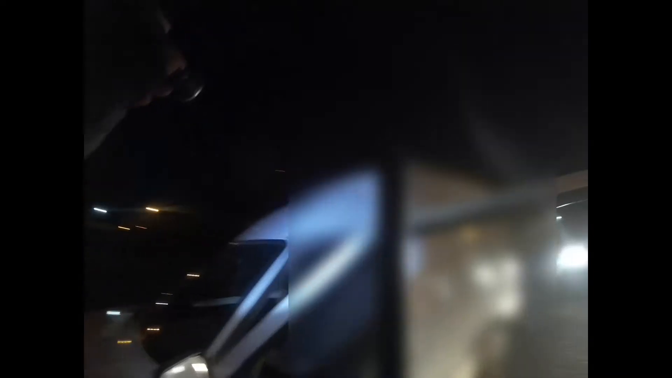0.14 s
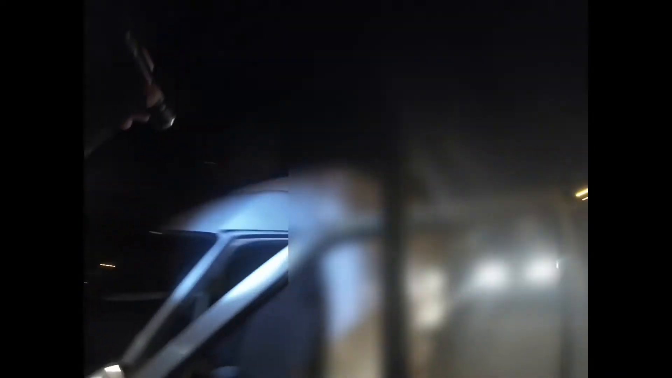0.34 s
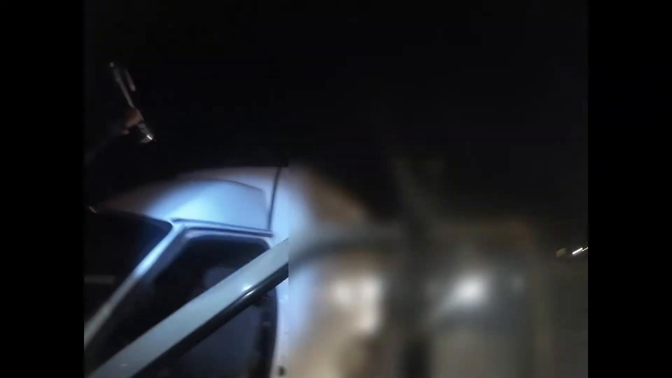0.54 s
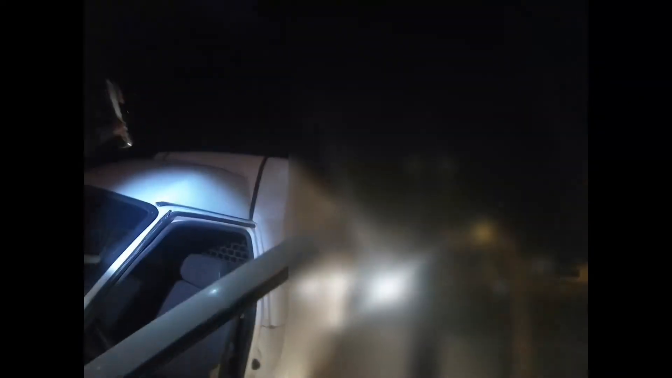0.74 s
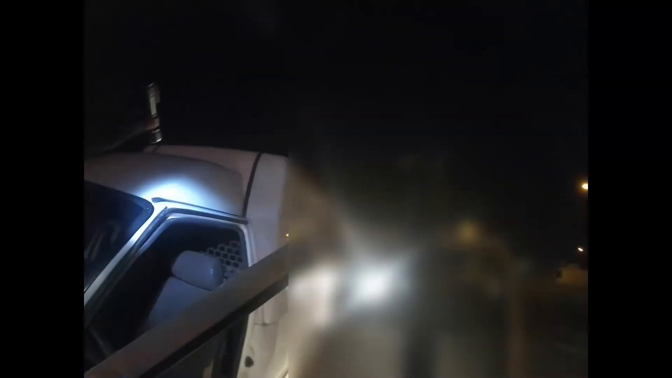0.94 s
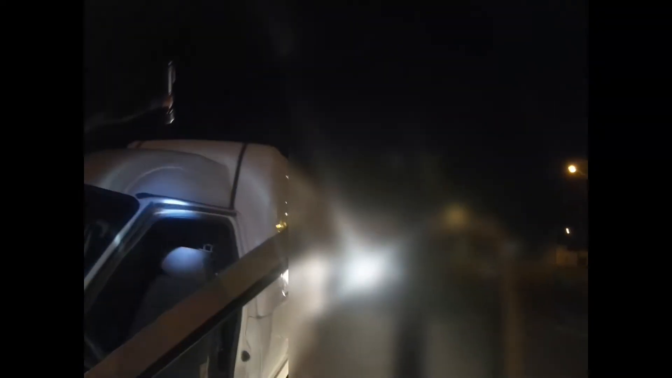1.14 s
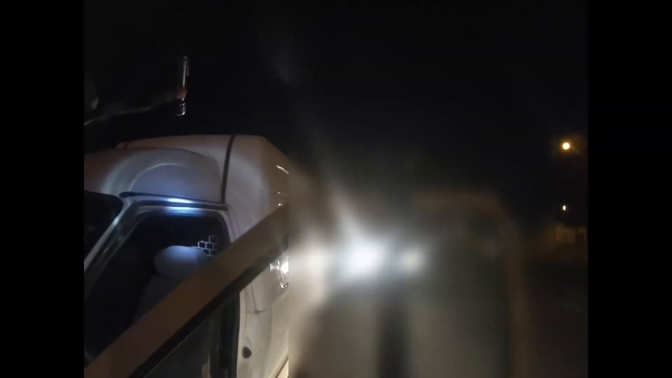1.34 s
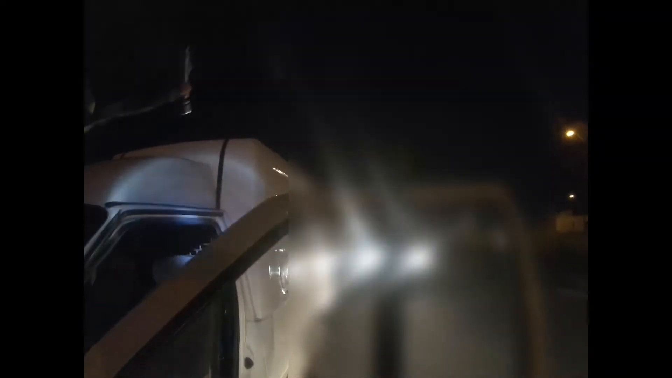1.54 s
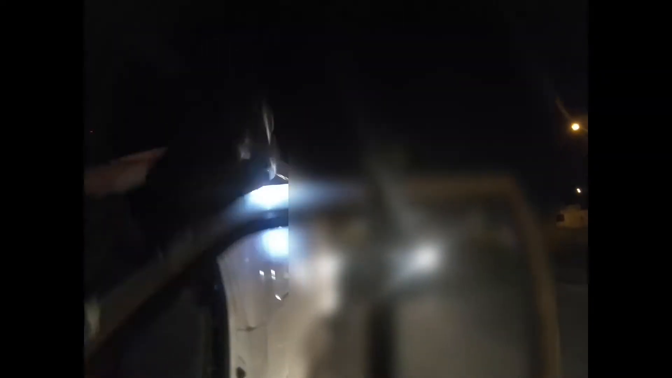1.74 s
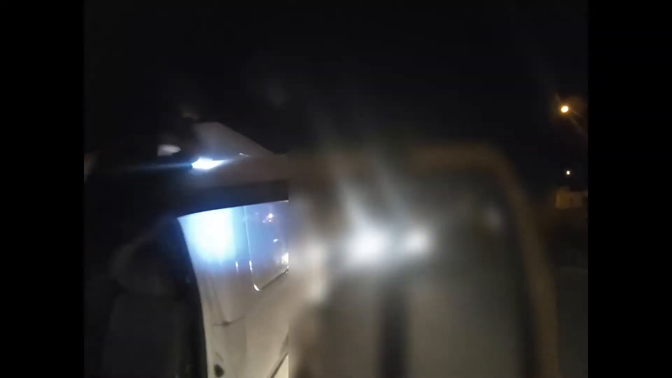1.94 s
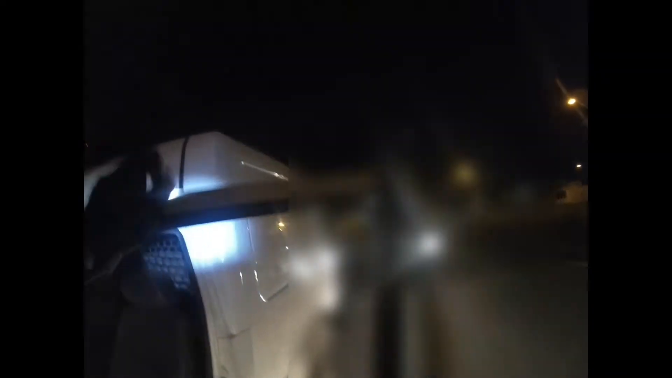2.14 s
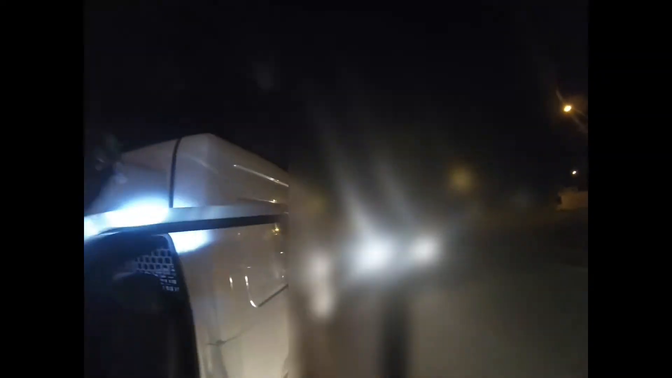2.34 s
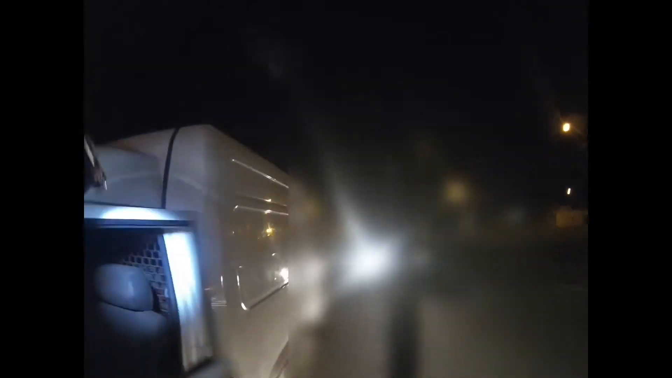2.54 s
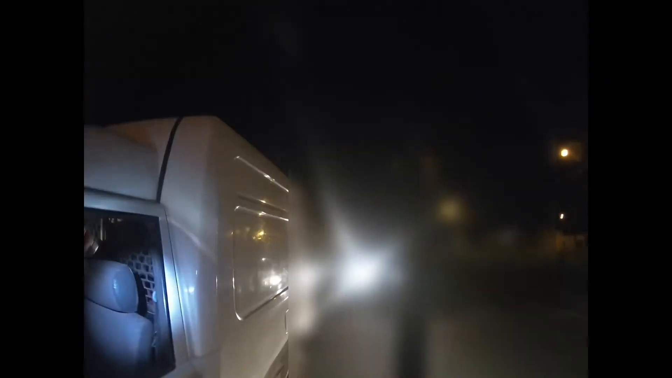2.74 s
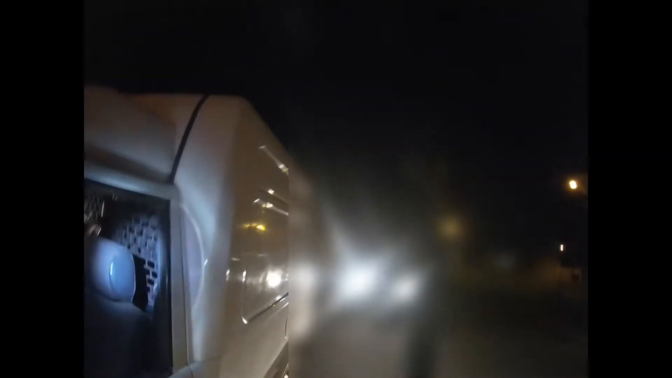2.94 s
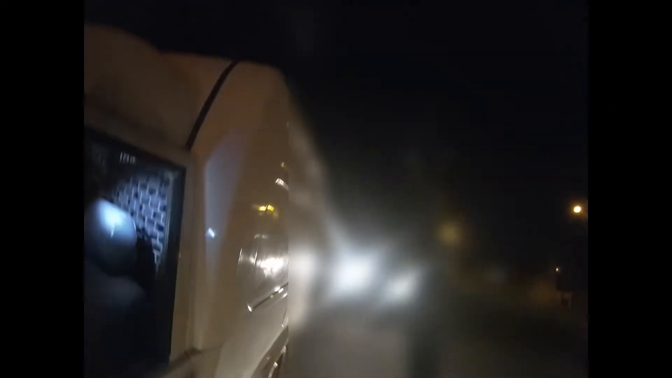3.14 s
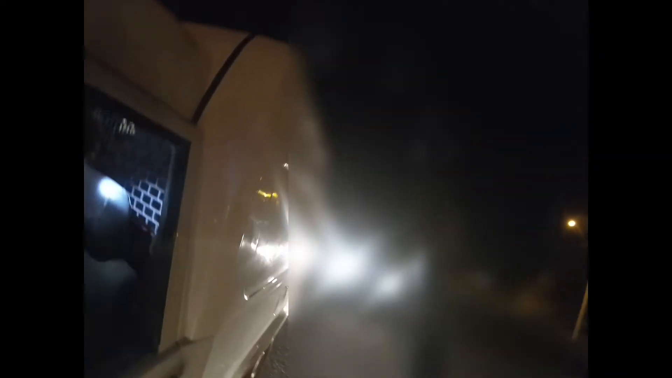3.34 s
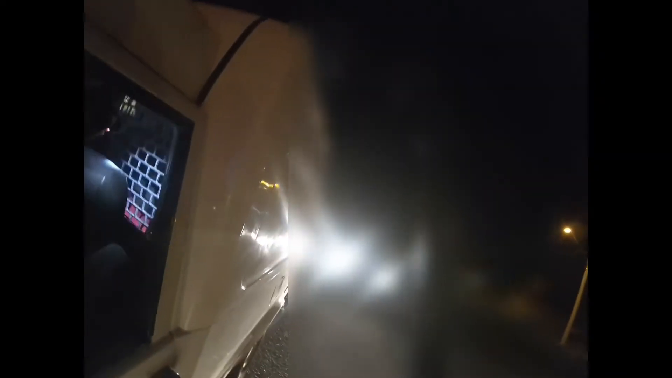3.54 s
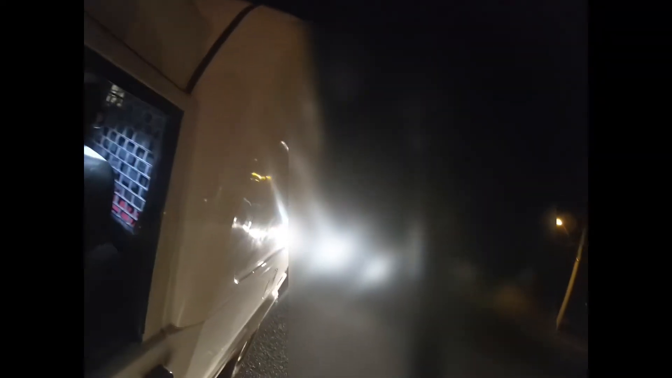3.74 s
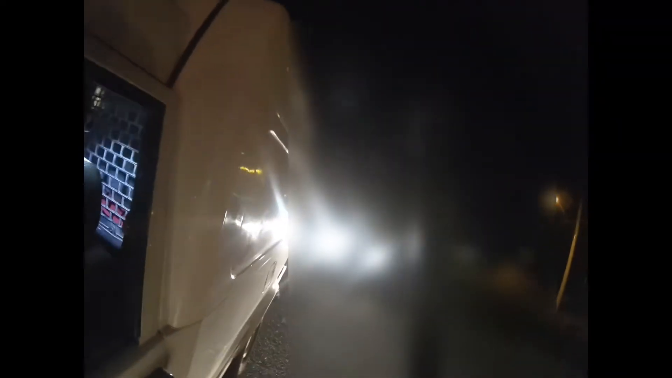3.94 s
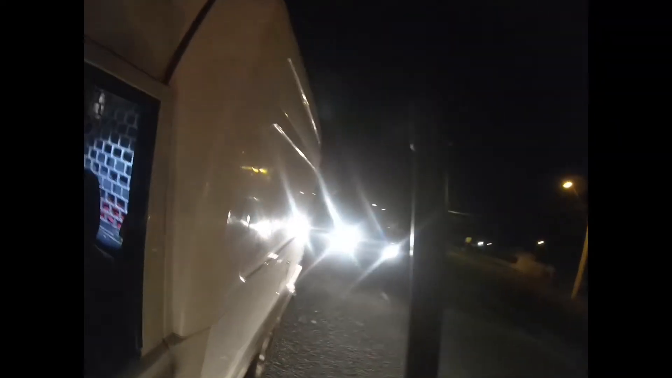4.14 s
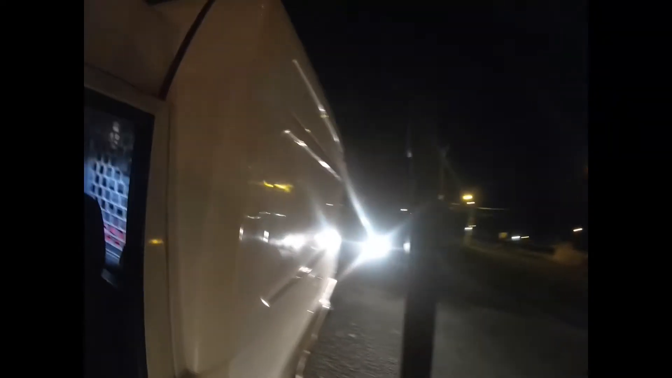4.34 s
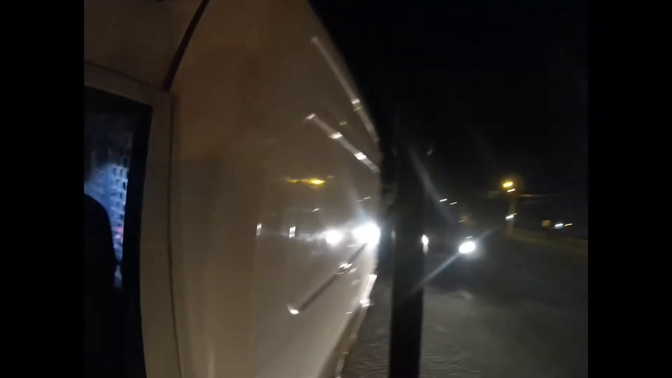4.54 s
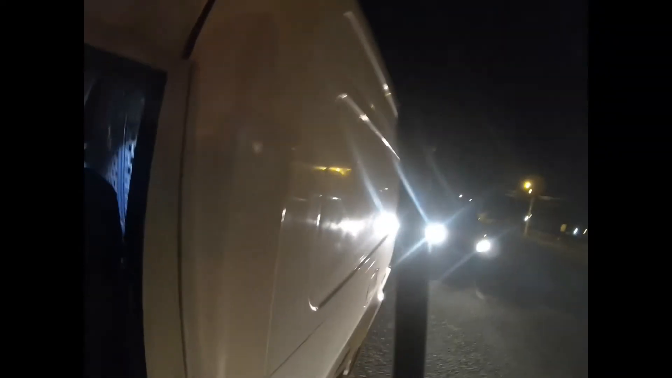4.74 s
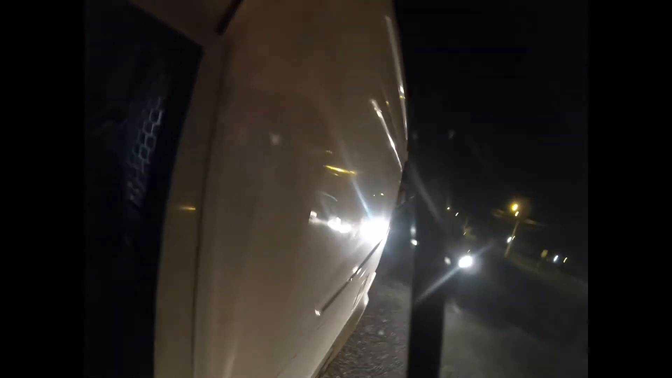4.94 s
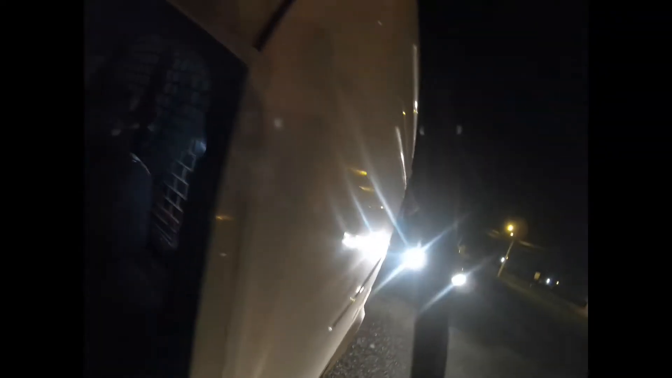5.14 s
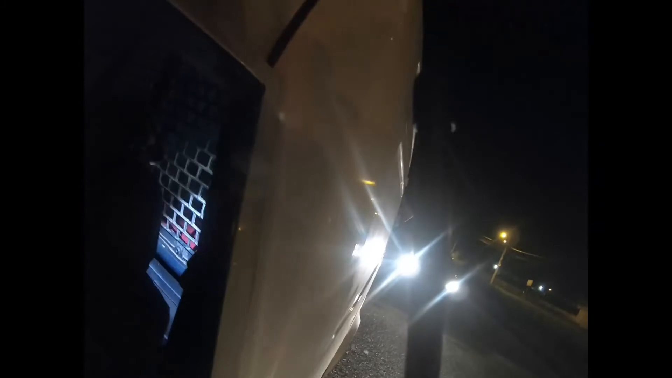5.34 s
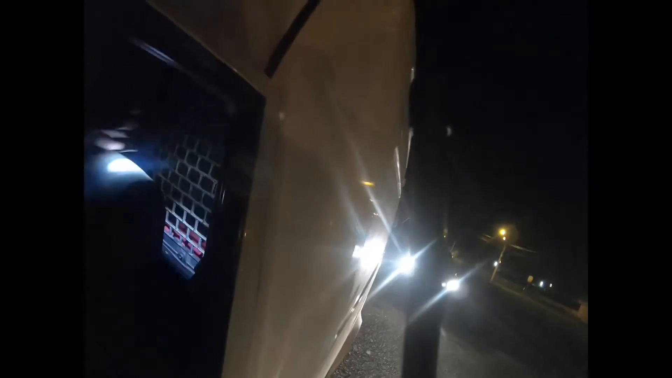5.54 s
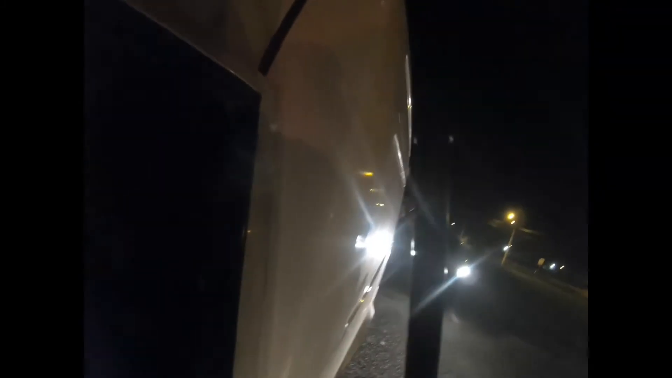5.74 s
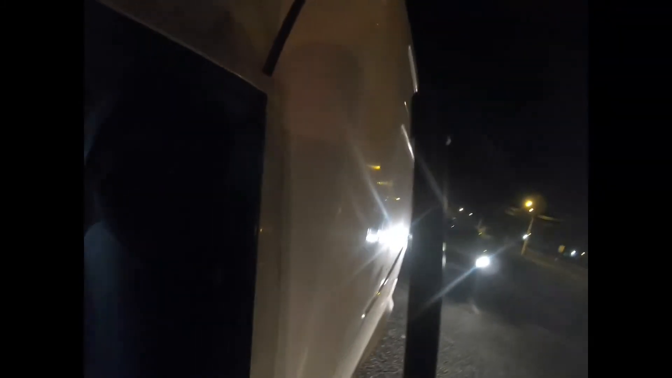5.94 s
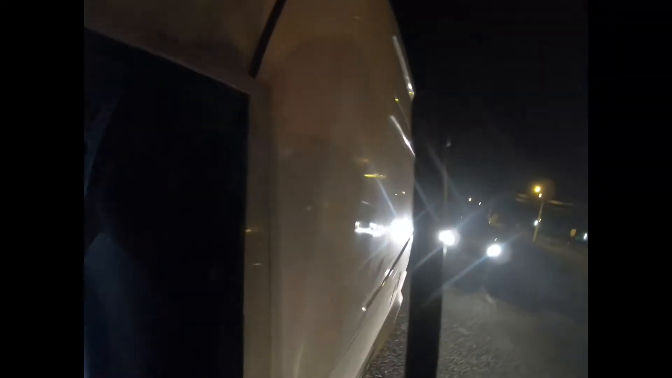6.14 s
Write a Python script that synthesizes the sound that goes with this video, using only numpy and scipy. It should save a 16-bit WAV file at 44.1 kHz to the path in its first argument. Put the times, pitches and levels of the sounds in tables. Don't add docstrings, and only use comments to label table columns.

```python
import sys
import numpy as np
from scipy import signal
from scipy.fft import rfft, irfft, next_fast_len
from scipy.io import wavfile
from scipy.ndimage import uniform_filter1d

SR = 44100
rng = np.random.default_rng(int(sys.argv[2]) if len(sys.argv) > 2 else 0)


def convert_level_to_amplitude(level_db):
    exponent = np.asarray(level_db, float) / 20
    return 10 ** exponent


def dump(signal):
    limited = np.clip(np.atleast_2d(signal).T, -1, 1)
    pcm = np.round(limited * 32767).astype(np.int16)
    wavfile.write(sys.argv[1], SR, pcm)


N = 272229
SIZE = next_fast_len(N + 4096)
TIME = np.arange(N) / SR
FREQ = np.arange(SIZE // 2 + 1) * SR / SIZE + 1e-3
SLAM_S = 2.613
DUCK_RISE_S = 0.09


def unit(x):
    return x / np.sqrt(np.mean(x ** 2))


def shape_db(points, hz):
    f, v = np.transpose(points)
    return np.interp(np.log(hz), np.log(f + 1e-3), v)


def bell(hz, width):
    return 1 / (1 + ((FREQ ** 2 - hz ** 2) / (FREQ * width)) ** 2)


def pair(gain, apart):
    both, own = rfft(rng.standard_normal((2, SIZE)))
    mixed = both + np.clip(apart, 0, 1) * own * np.array([[1], [-1]])
    return unit(irfft(mixed * gain, SIZE)[:, :N])


def walk(rate):
    k = int(SR / rate)
    levels = np.repeat(rng.standard_normal(N // k + 1), k)
    return unit(uniform_filter1d(uniform_filter1d(levels, k), k)[:N])


def ring(x, modes):
    out = 0
    for hz, db, t60 in modes:
        pole = np.exp(2j * np.pi * hz / SR - np.log(1000) / (t60 * SR))
        out = out + convert_level_to_amplitude(db) * signal.lfilter([1], [1, -pole], x).imag
    return out


def fade(s, t60, rise=0.00027):
    t = np.maximum(TIME - s, 0)
    return (1 - np.exp(-t / rise)) * np.exp(-np.log(1000) * t / t60)


def thump(s, hz):
    return np.sin(2 * np.pi * hz * (TIME - s))


def track(table, edge=0.083):
    s, hz, db = np.transpose(table)
    gate = np.clip(np.minimum(TIME - s[0], s[-1] + edge - TIME) / edge, 0, 1)
    return np.interp(TIME, s, hz), gate * convert_level_to_amplitude(np.interp(TIME, s, db))


def glide(row, db, rise=.35):
    start, end, first_hz, last_hz = row
    u = np.clip((TIME - start) / (end - start), 0, 1)
    peak = np.clip(rise, .02, .9)
    swell = np.sin(np.pi / 2 * np.minimum(u / peak, (1 - u) / (1 - peak)))
    return first_hz + (last_hz - first_hz) * u, convert_level_to_amplitude(db) * swell


def tone(line, wobble, flutter_db, rate, drift=.0):
    hz, gain = line
    phase = 2 * np.pi * np.cumsum(hz * (1 + wobble * walk(rate))) / SR
    phase = phase + drift * walk(2.02) * np.array([[1], [-1]])
    return np.sqrt(2) * gain * convert_level_to_amplitude(flutter_db * walk(rate)) * np.sin(phase)


def nearness(s, wide):
    return 1 / (1 + ((TIME - s) / wide) ** 2)


# (frequency [Hz], level [dB per Hz])
TRAFFIC_SHAPE = [(8.8, -39), (15, -23), (54, -2.5), (117, -3.5), (166, -11), (231, -14), (289, -19),
                 (371, -24.5), (410, -26), (695, -30.5), (915, -35), (1470, -36), (4910, -57),
                 (6000, -53.5), (7800, -80), (13200, -120)]
# (frequency [Hz], level [dB per Hz])
AIR_SHAPE = [(3000, -18), (4600, -18), (5400, -7), (6300, 6), (8800, 3.5), (11000, -4.5), (12500, -10),
             (14300, -14), (15300, -23)]
# (frequency [Hz], width [Hz], level [dB])
TREAD_BANDS = [(901, 130, 2), (1188, 170, -3), (1350, 29, -20), (2026, 200, -13.5)]
# (closest [s], time to half power [s], engine [dB], tyre roar [dB], hiss [dB])
PASSES = [
    (0.0, 0.1, 8, -17, 5.5),
    (1.4, 0.86, -0.5, 8.5, 3),
    (2.0, 0.76, -3, 9.5, -7),
    (3.9, 0.48, -13, 7, 4),
    (4.7, 0.33, 8.5, 6.5, 7),
    (6.2, 0.42, 9, 2.5, 7),
]
# (frequency [Hz], share [0-1])
ROAD_APART = [(25, .26), (120, .4), (400, .55), (700, .75), (1200, .4), (2400, .6), (6000, .62),
              (7400, .25), (10000, .12)]
AIR_DB, TREAD_DB, NEARING_DB = -75.5, -47, -50.5
TREAD_S, TREAD_WIDE_S, NEARING_S, NEARING_WIDE_S = 1.2, 0.6, 6.02, 0.65
HUSH_DB, HUSH_T60_S = -3.5, 8.7


def traffic():
    engine, roar, hiss = (10 * np.log10(1 + sum(convert_level_to_amplitude(2 * p[k]) * nearness(*p[:2]) for p in PASSES))
                          for k in (2, 3, 4))
    hush = HUSH_DB * fade(SLAM_S, HUSH_T60_S, rise=DUCK_RISE_S)
    swells = [0.88 * engine + 2.13 * walk(3.05), engine + hush, roar + hush, hiss + hush]
    apart = shape_db(ROAD_APART, FREQ)
    road, shared = 0, walk(6.747)
    for hz in 18 * 2 ** np.arange(0, 8.6, 1 / 2):
        place = np.interp(np.log(hz), np.log([100, 300, 1000, 3000]), range(4))
        k = min(int(place), 2)
        db = swells[k] + (place - k) * (swells[k + 1] - swells[k])
        centre_db = shape_db(TRAFFIC_SHAPE, hz)
        db = db + centre_db + 10 * np.log10(hz) + 0.93 * shared + 0.6 * walk(13)
        colour = bell(hz, hz * .5) * convert_level_to_amplitude(shape_db(TRAFFIC_SHAPE, FREQ) - centre_db)
        road = road + convert_level_to_amplitude(db) * pair(colour, apart=apart)
    tread_colour = sum(convert_level_to_amplitude(db) * bell(hz, width) for hz, width, db in TREAD_BANDS)
    tread = convert_level_to_amplitude(TREAD_DB) * nearness(TREAD_S, TREAD_WIDE_S) * pair(tread_colour, apart=0.76)
    air_db = AIR_DB + 1.325 * hiss + 2.0 * hush + 0.6 * walk(25.27)
    air = convert_level_to_amplitude(air_db) * pair(convert_level_to_amplitude(shape_db(AIR_SHAPE, FREQ)), apart=apart)
    near_colour = bell(544, 310) + 0.23 * bell(2170, 500) + 0.11 * bell(3290, 1300) ** 2
    nearing = convert_level_to_amplitude(NEARING_DB) * nearness(NEARING_S, NEARING_WIDE_S) * pair(near_colour, apart=0.37)
    return unit(road) * convert_level_to_amplitude(-34) + tread + air + nearing


# (time [s], firing pitch [Hz], level [dB])
LORRY = [(.12, 39.88, -35), (.6, 41.42, -33), (1.5, 48.28, -37.5), (2, 53.37, -30.5), (2.6, 55.86, -40.5),
         (3.2, 59.9, -36.5), (3.6, 63.77, -38.5), (4.2, 67.03, -31.5), (4.7, 70.3, -41)]
# (time [s], firing pitch [Hz], level [dB])
CAR_LOW = [(2.75, 44.86, -27), (3.5, 50.39, -45), (4.2, 47.24, -38), (5.1, 60.1, -31.5), (5.35, 57.4, -62)]
# (start [s], end [s], first pitch [Hz], last pitch [Hz])
CAR = (3.55, 5.3, 68.4, 126)
CAR_DB = -34
# (start [s], end [s], first pitch [Hz], last pitch [Hz])
GEARS = [(5.05, 5.55, 207, 243), (5.52, 6.05, 239, 266), (5.62, 6.6, 213, 246), (5.2, 5.42, 345, 372),
         (5.36, 5.72, 365, 393), (5.3, 5.75, 334, 356), (5.95, 6.2, 378, 378), (5.05, 5.5, 172, 198),
         (5.33, 5.56, 505, 507), (5.65, 6.0, 428, 455), (5.85, 6.2, 520, 552)]
GEARS_DB = [-41, -40, -37, -50.5, -46.5, -52.5, -50.5, -42.5, -55.5, -57, -62]
# (time [s], pitch of its sixth order [Hz], level [dB])
IDLE = [(0, 127, -50.5), (.8, 128, -45.5), (1.6, 130, -57), (2.5, 137, -43), (3.5, 146, -44),
        (4.5, 148, -38), (5.2, 145, -41.5), (5.6, 142.5, -41.5), (6.17, 138, -36)]
# (multiple of its cycle [-], level [dB])
IDLE_ORDERS = [(1, 4), (1.5, -13), (2, -4), (3, 1), (4, -2), (5, 0.5), (6, 1), (8, -15), (9, -30)]


def engines():
    out = 0
    for line in [track(LORRY), track(CAR_LOW), glide(CAR, CAR_DB, rise=0.43)]:
        out = out + tone(line, wobble=0.012, flutter_db=1.5, rate=7.3, drift=0.38)
    for row, db in zip(GEARS, GEARS_DB):
        out = out + tone(glide(row, db, rise=0.37), wobble=0.002, flutter_db=1, rate=9, drift=0.06)
    hz, gain = track(IDLE)
    cycle = 2 * np.pi * np.cumsum(hz / 6 * (1 + .006 * walk(8))) / SR
    idle = sum(convert_level_to_amplitude(db + 4.1 * walk(7)) * np.sin(k * cycle + k * k) for k, db in IDLE_ORDERS)
    return out + gain * idle


# (start [s], end [s], first pitch [Hz], last pitch [Hz])
ROUGH_GRABS = [
    (.06, .65, 7665, 7615),
    (.42, .85, 7650, 7560),
    (.7, .95, 7570, 7545),
    (.82, 1.45, 7560, 7480),
]
ROUGH_DB = [-64.5, -66.5, -68, -76]
# (start [s], end [s], first pitch [Hz], last pitch [Hz])
SQUEALS = [(2.83, 3.06, 6245, 6240), (2.93, 3.07, 6240, 6235), (3.055, 3.125, 6225, 6235),
           (3.1, 3.22, 6240, 6245), (3.17, 3.31, 6235, 6260), (3.32, 3.53, 6250, 6285),
           (4.69, 4.83, 6225, 6195), (4.8, 4.9, 6190, 6170), (4.86, 5.07, 6190, 6150)]
SQUEALS_DB = [-76, -69, -63, -73, -72, -78, -68, -65.5, -70.5]


def brakes():
    out, chatter = 0, sum(walk(rate) + 1j * walk(rate) for rate in (160, 300, 560))
    patchy = convert_level_to_amplitude(2 * walk(30))
    for row, db in zip(ROUGH_GRABS, ROUGH_DB):
        hz, gain = glide(row, db, rise=.3)
        out = out + gain * patchy * (chatter * np.exp(2j * np.pi * np.cumsum(hz) / SR)).real
    for row, db in zip(SQUEALS, SQUEALS_DB):
        out = out + tone(glide(row, db, rise=.3), wobble=.0042, flutter_db=3.5, rate=110)
    return out


# (time [s], peak [dB], pitch [Hz], t60 [s])
STEPS = [(0.02, -19, 117.3, 0.31), (0.399, -29.5, 122, 0.29), (0.849, -13, 87.7, 0.1),
         (1.315, -14, 108, 0.1), (1.738, -20, 128.7, 0.32), (2.344, -13.5, 94.94, 0.12),
         (3.389, -12, 107, 0.11), (4.569, -16, 129.3, 0.19), (4.666, -8.5, 105.4, 0.13),
         (4.883, -12, 115, 0.13), (5.03, -11.5, 110.2, 0.26), (5.098, -8, 113.6, 0.16),
         (5.385, -20, 120, 0.26), (5.47, -18, 114, 0.19), (3.96, -21, 96.7, 0.22), (1.03, -21, 70, 0.21)]
# (time [s], peak [dB], pitch [Hz], t60 [s])
BUMP = (.394, -19, 29, .16)
# (time [s], peak [dB], pitch [Hz], t60 [s])
KNOCKS = [(0.254, -40, 447, .03), (0.262, -26.5, 445, 0.057), (0.2659, -21.5, 343, 0.024),
          (0.278, -24.5, 420, 0.045), (.291, -24.5, 330, 0.022), (0.3025, -23.5, 520, 0.015),
          (0.309, -27, 420, 0.032), (4.578, -18.5, 355, 0.018), (4.6188, -24, 473, 0.018),
          (4.6209, -19.5, 314.6, 0.03), (5.033, -36, 310, 0.057), (5.797, -34, 620, 0.011)]
# (time [s], peak [dB], centre [Hz], width
# [Hz], t60 [s])
TICKS = [(.264, -52, 7500, 5000, .02), (.281, -53, 1900, 2500, .02), (.303, -33, 700, 500, .014),
         (.662, -52, 3000, 3000, .016), (1.338, -55, 9000, 6000, .014), (1.66, -42, 300, 120, .2),
         (1.811, -50, 2500, 2500, .02), (1.815, -35.5, 380, 450, .2), (1.826, -47, 2400, 2000, .07),
         (1.8395, -46, 7000, 2000, .011), (1.8515, -45, 7200, 2500, .009), (2.14, -50, 4000, 5000, .014),
         (2.144, -44, 2400, 1800, .037), (2.695, -29, 560, 400, .15), (2.76, -36, 450, 300, .07),
         (2.812, -39, 400, 250, .06), (3.072, -66, 7500, 3000, .02), (3.323, -55, 6900, 3400, .012),
         (4.015, -61, 7650, 500, .06), (4.573, -56, 3300, 1400, .05), (4.578, -51, 8000, 6000, .016),
         (4.5785, -37, 700, 500, .015), (4.62, -35, 650, 600, .018), (4.753, -52, 1970, 2400, .087),
         (4.757, -38, 520, 500, .1), (4.758, -47, 1700, 1200, .06), (4.763, -48, 2500, 2000, .05),
         (4.771, -51, 2200, 2400, .035), (4.90, -65, 8750, 6000, .34), (5.028, -57, 7660, 2500, .015),
         (5.29, -62, 8800, 900, .03), (5.797, -44, 900, 1200, .013), (5.962, -55, 2600, 2500, .03),
         (6.048, -54, 2600, 2500, .03), (6.083, -51, 2600, 3500, .03)]


def small_hits():
    out = np.zeros((2, N))
    lean = convert_level_to_amplitude(np.array([[-6.0], [3.0]]))
    for s, db, hz, t60 in [*STEPS, BUMP]:
        out += lean * convert_level_to_amplitude(db) * fade(s, t60, rise=0.0067) * thump(s, hz)
    thud = pair(bell(480, 600) ** 2, apart=.15)
    for s, db, hz, t60 in KNOCKS:
        out += convert_level_to_amplitude(db) * fade(s, t60, rise=.0012) * (thump(s, hz) + 0.2 * thud)
    for s, db, hz, width, t60 in TICKS:
        out += convert_level_to_amplitude(db) * fade(s, t60, rise=0.00036) * pair(bell(hz, width) ** 2, apart=0.12)
    return out


# (time [s], level [dB])
HANDLE = [
    (1.8130, -8),
    (1.8152, -15),
    (1.8169, -24),
    (1.8184, -18),
]
# (frequency [Hz], level [dB], t60 [s])
HANDLE_MODES = [(257, -12, 0.2), (396, -36, 0.065), (674, -7, 0.073), (1400, -21, 0.026),
                (1500, -11.5, 0.038), (1976, -0.5, 0.027), (2345, 0, 0.025), (2110, -5, 0.0057),
                (3240, -9, 0.012), (3600, -6.5, 0.014), (4170, -12, 0.01), (6400, -26, 0.007),
                (8800, -17, 0.014)]


def handle():
    kicks = np.zeros(N)
    for s, db in HANDLE:
        kicks[int(s * SR):int(s * SR) + 5] = convert_level_to_amplitude(db) * np.hanning(7)[1:-1] / 3
    s = HANDLE[0][0]
    crack_colour = bell(2200, 3500) ** 2 + 0.31 * bell(8200, 3800) ** 2 + 0.2 * bell(5600, 3000) ** 2
    crack = convert_level_to_amplitude(-21.0) * fade(s, 0.026, rise=0.00016) * pair(crack_colour, apart=0.7)
    crack = crack + convert_level_to_amplitude(-45.0) * fade(s, 0.008, rise=0.0001) * pair(bell(13500, 7000), apart=0.6)
    scatter_colour = bell(900, 1750) + 0.12 * bell(8600, 4000) ** 2
    scatter = convert_level_to_amplitude(-30.0) * fade(s, 0.092, rise=0.0017) * pair(scatter_colour, apart=0.73)
    return convert_level_to_amplitude(-11.5) * ring(kicks, HANDLE_MODES) + crack + scatter


# (time [s], level [dB], push [ms])
BLOWS = [(2.613, -24, 1.16), (2.6163, -15, 0.56), (2.6207, -10, 1.5), (2.635, -28.5, 1.1),
         (2.65, -19, 2.55), (2.7, -11, 4.74), (2.7037, -17, 5.2), (2.723, -21.5, 2.5), (2.741, -20, 3.3),
         (2.757, -21, 4.5), (2.776, -23, 3.6), (2.811, -27, 3.1), (2.834, -24.5, 4.3), (2.862, -29, 4.2)]
# (frequency [Hz], level [dB], t60 [s])
PANEL = [(135.3, -9, 0.26), (189.7, 1.5, 0.11), (242, -16, 0.5), (296, -14.5, 0.28), (377, -7, 0.073),
         (420, 1.5, 0.046), (497, -10, 0.062), (645, -20, 0.14), (770, -15, 0.058), (893, -27, .12),
         (1080, -23, 0.089), (1247, -11, 0.11), (1400, -19, 0.11), (1670, -30, .08)]


def door_panel():
    colour = bell(176, 120) + .5 * bell(700, 600)
    push = convert_level_to_amplitude(-51.5) * fade(SLAM_S, 0.4, rise=0.067) * pair(colour, apart=0.11)
    for s, db, ms in BLOWS:
        n = max(int(ms * SR / 1000), 4)
        push[:, int(s * SR):int(s * SR) + n] -= convert_level_to_amplitude(db) * np.hanning(n) * 2 / n
    return signal.sosfilt(signal.butter(2, 90, "high", fs=SR, output="sos"), ring(push, PANEL))


# (time [s], peak [dB], pitch [Hz], t60 [s])
SWELLS = [
    (2.701, -21, 86.7, 0.3),
    (2.7, -19, 144, .22),
    (2.855, -21, 92, .12),
    (2.99, -24, 80, .15),
]
BOOM_HZ, BOOM_DIP_S = 68, 2.6665
BOOM_S, BOOM_ATTACK_S, BOOM_HOLD_S = 2.62, .02, .058
BOOM_DB, BOOM_CLIMB_DB, BOOM_T60_S = -13, -0.5, 0.04
BOOM_TAIL_DB, BOOM_TAIL_T60_S = -22, 1
REBOUND_S, REBOUND_WIDE_S, REBOUND_DB = 2.667, .009, -4


def cab_boom():
    let_go = BOOM_S + BOOM_ATTACK_S + BOOM_HOLD_S
    climb_db = BOOM_CLIMB_DB * np.maximum(let_go - TIME, 0) / BOOM_HOLD_S
    fall_db = 60 * np.maximum(TIME - let_go, 0) / BOOM_T60_S
    squeeze = np.clip((TIME - BOOM_S) / BOOM_ATTACK_S, 0, 1) * convert_level_to_amplitude(BOOM_DB - climb_db - fall_db)
    squeeze = squeeze * convert_level_to_amplitude(REBOUND_DB * np.exp(-((TIME - REBOUND_S) / REBOUND_WIDE_S) ** 2))
    tail = convert_level_to_amplitude(BOOM_TAIL_DB) * fade(let_go, BOOM_TAIL_T60_S, rise=0.074)
    boom = -np.sqrt(2) * (squeeze + tail) * np.cos(2 * np.pi * BOOM_HZ * (TIME - BOOM_DIP_S))
    return boom + sum(convert_level_to_amplitude(db) * fade(s, t60, rise=0.022) * thump(s, hz) for s, db, hz, t60 in SWELLS)


# (time [s], peak [dB], centre [Hz], t60 [s])
RATTLES = [(2.614, -17.5, 1400, 0.053), (2.618, -21.5, 2400, 0.065), (2.6235, -26, 2400, .05),
           (2.632, -16.5, 2420, 0.15), (2.636, -27, 3000, 0.043), (2.6458, -14.5, 3360, 0.042),
           (2.653, -28, 2930, .05), (2.660, -34, 2500, 0.06), (2.669, -24.5, 2920, 0.063),
           (2.677, -28, 2700, 0.097), (2.69, -24, 1490, 0.1), (2.699, -27, 2400, 0.061),
           (2.7097, -19, 3270, 0.042), (2.7145, -26.5, 3000, 0.095), (2.721, -35, 2640, 0.05),
           (2.730, -36, 2500, 0.067), (2.754, -37, 3200, 0.06), (2.761, -42, 3000, 0.065),
           (2.797, -52, 2500, .04), (2.8034, -50, 3500, 0.04), (2.8323, -48, 2730, 0.067),
           (2.84, -49, 2670, 0.083)]
# (frequency [Hz], level [dB per Hz])
RATTLE_SHAPE = [(180, -35), (300, 0), (509, 2), (562, -3), (794, -5.5), (1030, -9.5), (1670, -17),
                (2210, -28.5), (3740, -29.5), (4900, -40), (7360, -32), (14000, -41.5), (15500, -52)]
# (frequency [Hz], share [0-1])
TRIM_APART = [(1200, .3), (2400, .45), (3200, .6), (4200, .55), (6000, .95), (9500, .95), (12000, .35)]


def trim_rattle():
    trim, rattle = convert_level_to_amplitude(shape_db(RATTLE_SHAPE, FREQ)), 0
    bright = trim * FREQ ** 2 / (FREQ ** 2 + 1200 ** 2)
    for s, db, hz, t60 in RATTLES:
        contact = 0.085 / (1 + (FREQ * (s - SLAM_S) / 900) ** 2)
        colour = bright * (contact + bell(hz, 2600) + 0.098 * bell(5900, 2200) ** 2)
        burst = pair(colour, apart=shape_db(TRIM_APART, FREQ))
        rattle = rattle + convert_level_to_amplitude(db) * fade(s, t60, rise=0.0012) * burst
    tail = convert_level_to_amplitude(-14.5) * fade(SLAM_S, 0.3, rise=0.011) * pair(trim, apart=0.33)
    grain = convert_level_to_amplitude(2.6 * walk(600))
    return convert_level_to_amplitude(-6.5) * grain * rattle + tail


# (time [s], level [dB])
CLINKS = [(2.6158, -11), (2.6325, 5), (2.6376, -8), (2.6467, -2), (2.649, 2), (2.674, -7), (2.7098, -1),
          (2.7135, -5), (2.716, -11), (2.733, -16), (2.758, -22), (2.764, -24), (2.8029, -24),
          (2.8326, -22.5)]
# (frequency [Hz], level [dB], t60 [s])
CLINK_MODES = [(1615, -12, .08), (2040, -8, .06), (2239, 0, 0.031), (2400, -4, 0.1), (2659, -7, .08),
               (2990, -3, 0.074), (3354, -10.5, 0.064), (3840, -2, 0.051), (3970, -23, .05),
               (5950, -10, .05), (6600, -12, .04), (7600, -4, .05), (8350, -22, .05)]
CLINK_DB = -40.5


def latch_clink():
    strikes = np.zeros((2, N))
    for (s, db), spot in zip(CLINKS, rng.standard_normal((len(CLINKS), 2, 6))):
        strikes[:, int(s * SR):int(s * SR) + 6] = convert_level_to_amplitude(CLINK_DB + db) * (spot[0] + spot) / 2.6
    return ring(strikes, CLINK_MODES)


def door():
    return door_panel() + cab_boom() + trim_rattle() + latch_clink()


def ports(x, phase, balance):
    half = convert_level_to_amplitude(shape_db(balance, FREQ) / 2) * np.exp(.5j * shape_db(phase, FREQ))
    m = 2048
    margins = np.interp(np.arange(N + 2 * m), [0, m, N + m, N + 2 * m], [0, 1, 1, 0])
    wide = np.pad(x, ((0, 0), (m, m)), "reflect") * margins
    return irfft(rfft(wide, SIZE) * np.array([half, 1 / half]), SIZE)[:, m:m + N]


# (frequency [Hz], left leads by [rad])
PORT_PHASE = [(60, -.2), (520, -.4), (780, 1.5), (1200, 2.3), (1800, 1.8), (2500, 1.6), (3300, .4),
              (4300, .15), (6000, -.25), (7600, 0)]
# (frequency [Hz], left minus right [dB])
PORT_BALANCE = [(60, 1.5), (110, -4), (200, -2), (380, -7), (700, -3), (1290, 1.5), (2380, 0), (4400, -4),
                (8120, 1), (15000, -3)]
# (frequency [Hz], left leads by [rad])
NEAR_PHASE = [(60, -.2), (700, -.2), (1200, 1.8), (1800, 1.3), (2400, 1.6), (3200, 1.1), (4200, .5),
              (6000, .2), (7600, 1.5), (9500, 2.2), (12000, .3)]
# (frequency [Hz], left minus right [dB])
NEAR_BALANCE = [(60, 1), (110, 0), (200, -2), (380, -4.5), (700, -7), (1290, -1.5), (1800, -2), (2500, 3.5),
                (3300, 3), (4400, -1), (7600, -4), (12000, 0)]
DUCK_DB, DUCK_T60_S = -1.5, 6


def scene():
    far = ports(traffic() + engines() + brakes(), PORT_PHASE, PORT_BALANCE)
    far = far * convert_level_to_amplitude(DUCK_DB * fade(SLAM_S, DUCK_T60_S, rise=DUCK_RISE_S))
    near = ports(small_hits() + handle() + door(), NEAR_PHASE, NEAR_BALANCE)
    return far + near


def top_cut(x):
    return signal.sosfilt(signal.butter(12, 15620, fs=SR, output="sos"), x)


TOP_HZ, FADE_S = 15250, .006


def record(dry):
    rounded = np.tanh(1.1 * dry) / 1.1
    ends = np.minimum(np.minimum(TIME, TIME[::-1]) / FADE_S, 1)
    low_pass = signal.ellip(8, .2, 60, TOP_HZ, fs=SR, output="sos")
    return top_cut(signal.sosfilt(low_pass, rounded * ends))


dry = scene()
out = record(dry)
dump(out)
```